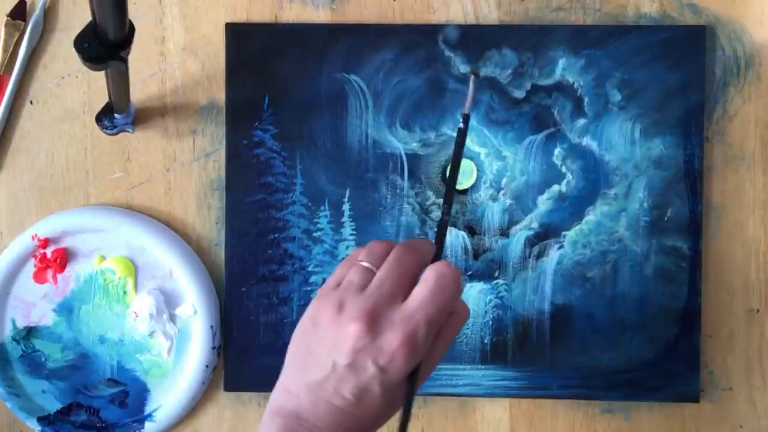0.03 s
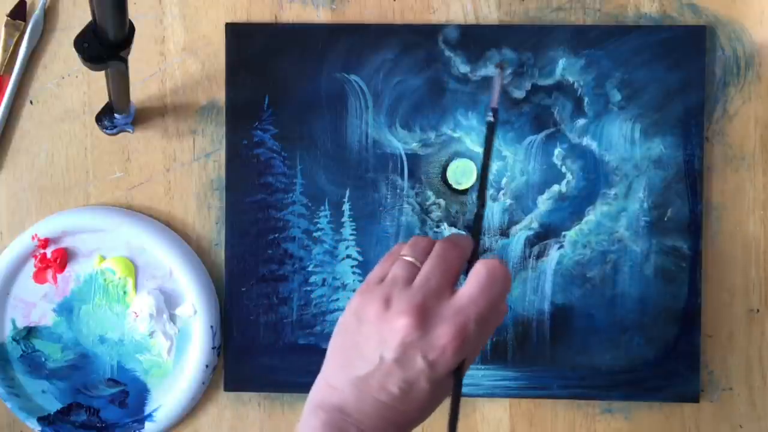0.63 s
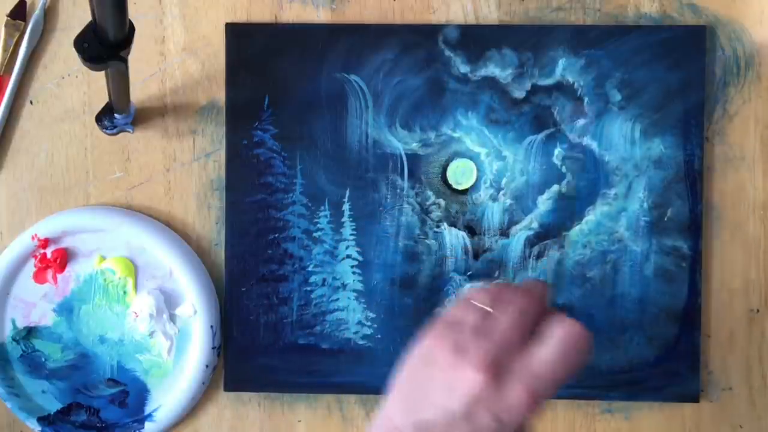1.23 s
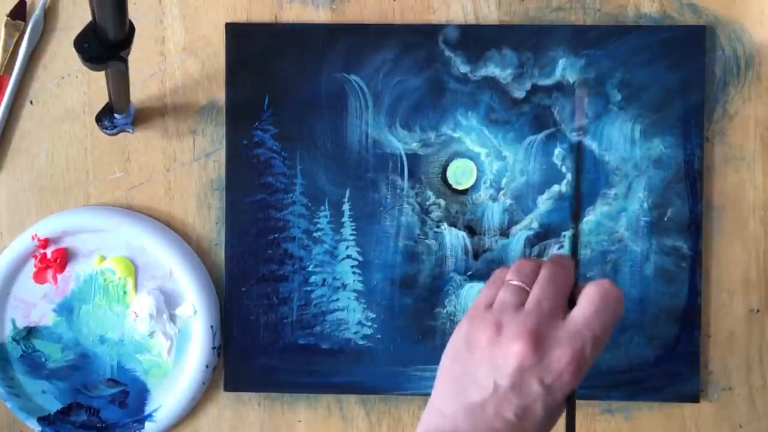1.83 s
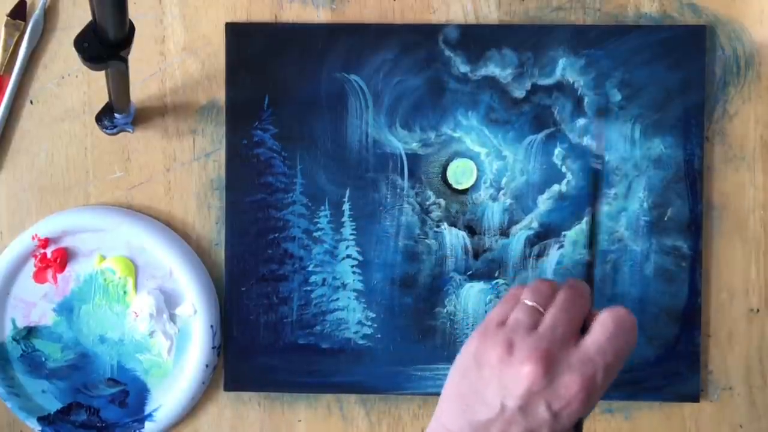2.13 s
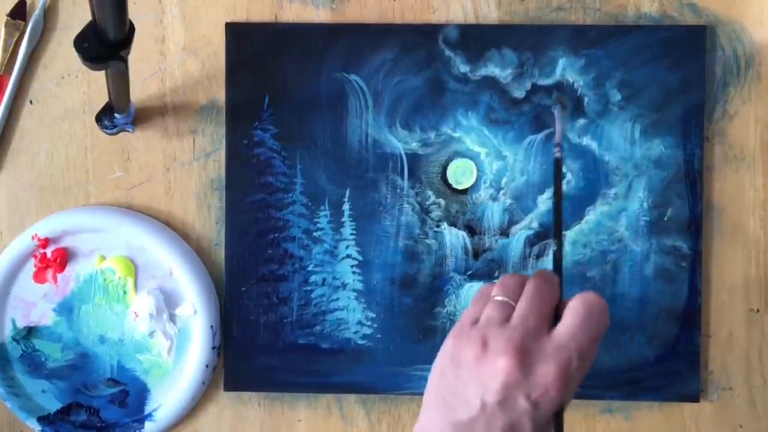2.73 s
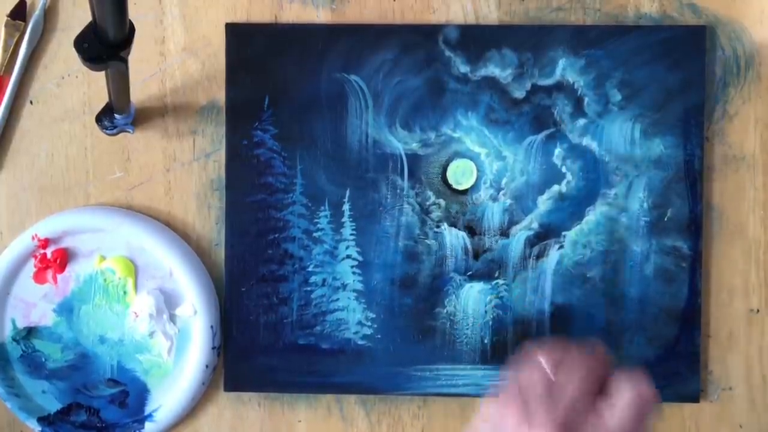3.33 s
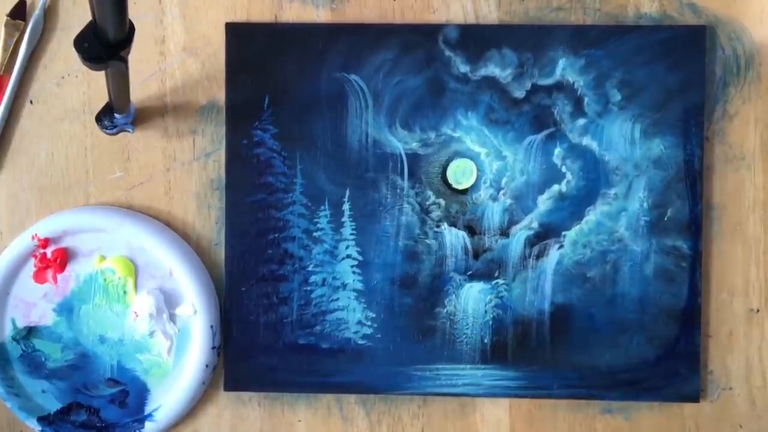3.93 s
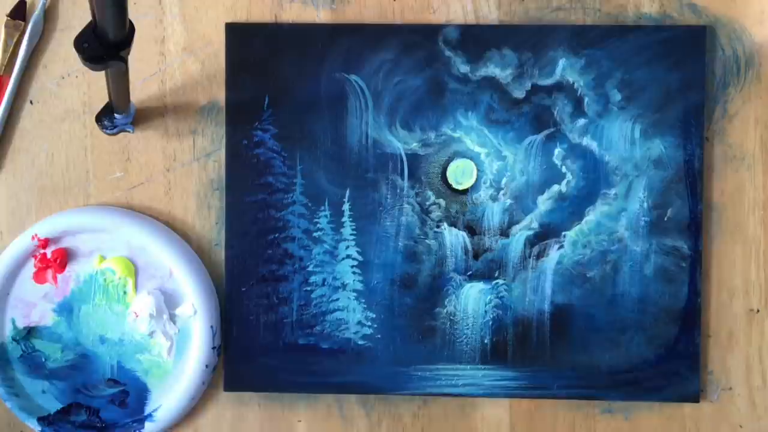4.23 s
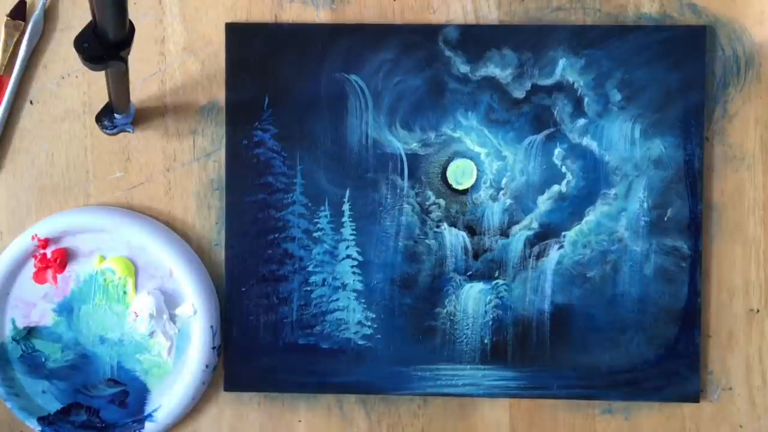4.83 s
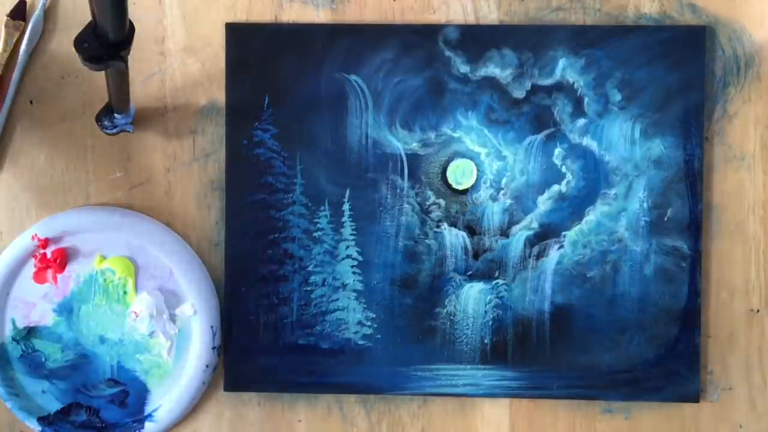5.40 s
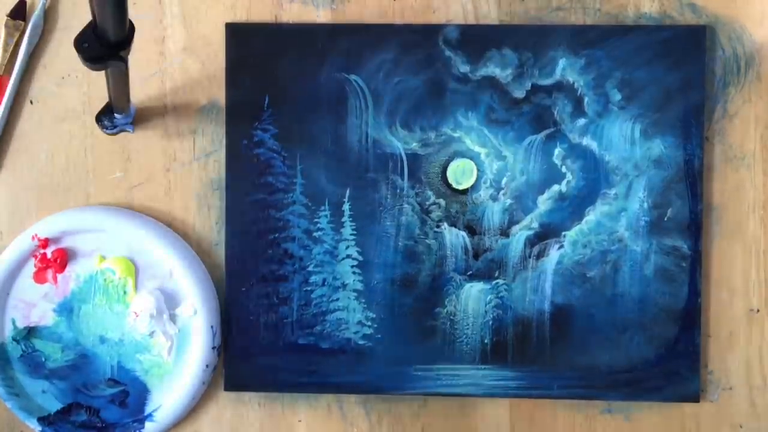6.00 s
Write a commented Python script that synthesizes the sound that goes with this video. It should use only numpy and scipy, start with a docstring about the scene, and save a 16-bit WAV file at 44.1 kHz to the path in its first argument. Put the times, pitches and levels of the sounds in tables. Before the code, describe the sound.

In a quiet room with a steady, soft ventilation hum, bristles touch a nearby canvas in faint, irregular dabs. Then the paintbrush is laid on a wooden table farther from the microphone: one sharp, loud knock of the handle, a short slide, a duller knock and a small bounce, each with a brief room echo. It settles with a couple of very faint taps.

```python
"""Paintbrush on canvas and table

A small brush dabs softly at a nearby canvas in a quiet room; its hairs hiss and its ferrule ticks once.
It is then set aside on a wooden table farther off: the handle knocks sharply once, slides, drops with a
duller knock and bounces. Each impact excites the modes of handle and table, and the room reverberates
briefly. Ventilation murmurs underneath."""
import sys
import numpy as np
from scipy import signal
from scipy.fft import rfft, irfft
from scipy.io import wavfile

SR = 44100
rng = np.random.default_rng(int(sys.argv[2]) if len(sys.argv) > 2 else 0)


def wav_record(signal):
    """Record a signal, one row per channel, as 16-bit PCM in the file named by sys.argv[1]."""
    frames = np.transpose(np.atleast_2d(signal))
    bounded = np.clip(frames, -1, 1)
    # unit amplitude maps onto the largest positive 16-bit level
    quanta = np.round(bounded * 32767).astype(np.int16)
    wavfile.write(sys.argv[1], SR, quanta)


N = 267290
CUTOFF_HZ = 15700   # upper limit of the sound's spectrum


def from_db(db):
    """Amplitude ratio of a level in decibels."""
    return 10 ** (np.asarray(db) / 20)


def unit_rms(x):
    """Normalisation to an rms amplitude of 1."""
    return x / np.sqrt(np.mean(x ** 2) + 1e-20)


def at_hz(points, hz, column=1):
    """Interpolation of a table column on a logarithmic frequency axis."""
    points = np.array(points)
    return np.interp(np.log(np.maximum(hz, 1)), np.log(points[:, 0]), points[:, column])


def coloured_noise(spectrum, size=N):
    """Random phases under a spectral envelope give noise, here of unit rms."""
    hz = np.fft.rfftfreq(size, 1 / SR)
    phases = np.exp(2j * np.pi * rng.random(len(hz)))
    return unit_rms(irfft(from_db(at_hz(spectrum, hz)) * phases, size))


def filtered(x, kind, hz):
    """Second-order low-pass or high-pass: 12 dB per octave beyond the cutoff."""
    return signal.sosfilt(signal.butter(2, hz, kind, fs=SR, output="sos"), x)


def swell(middle_s, sigma_s):
    """Envelope of a smooth touch: pressure rises and falls as a bell curve."""
    return np.exp(-.5 * ((np.arange(N) / SR - middle_s) / sigma_s) ** 2)


def decay(t, t60):
    """Exponential damping: 60 dB are lost in t60 seconds."""
    return np.exp(-np.log(1000) * t / t60)


def add(track, start_s, sound):
    """Superposition of a sound on the track from a given time."""
    start = round(start_s * SR)
    track[start:start + len(sound)] += sound[:N - start]


def ventilation(air_db=-54.5):
    """Steady broadband air noise, with a wavering drone from noise-driven room resonances."""
    # spectrum of the moving air: (frequency [Hz], relative spectral level [dB])
    air_spectrum = [(15, -49), (25, -24), (44, -8.5), (86, -4.5), (116, -1.5), (178, -9), (281, -8),
                    (349, -7), (741, -14.5), (997, -13.5), (1950, -23), (2300, -24), (2630, -26),
                    (6210, -29.5), (15500, -39)]
    # low room resonances: (frequency [Hz], bandwidth [Hz], level [dB])
    resonances = [(114, 9, -63), (150, 12, -73.5), (295, 21, -70), (358, 45, -69.5)]
    out = from_db(air_db) * coloured_noise(air_spectrum)
    for hz, width, db in resonances:
        resonator = signal.iirpeak(hz, hz / width, fs=SR)
        drone = signal.lfilter(*resonator, rng.standard_normal(N + SR))[SR:]   # steady state only
        out += from_db(db) * unit_rms(drone)
    return out


def brush_dabs(grain_db=2.0, crossover_hz=5500, sigma_s=.017, usual_db=-60.5):
    """Friction noise of many hairs on the weave; a firmer dab bends them further and scratches lower."""
    # touches of the bristles on the canvas: (time of peak [s], level [dB])
    dabs = [(.25, -63.5), (.432, -66.5), (.622, -61.5), (.805, -63.5), (1.038, -65), (1.095, -62),
            (1.778, -56.5), (2.019, -57.5), (2.15, -64), (2.208, -62.5), (2.323, -61.5), (2.39, -56.5),
            (2.827, -61.5), (2.888, -60), (3, -62), (3.073, -60.5), (3.24, -65.5), (3.382, -53)]
    # friction spectrum of the bristles: (frequency [Hz], relative spectral level [dB])
    bristle_spectrum = [(700, -2), (1300, -7), (1750, 6), (2150, -12), (2850, 0), (3600, -2), (6800, -3),
                        (8200, -7.5), (15500, -4.5)]
    hairs = coloured_noise(bristle_spectrum)
    flicker = unit_rms(filtered(rng.standard_normal(N), "low", 600))
    hairs *= from_db(grain_db * flicker)
    scratch = filtered(hairs, "low", crossover_hz)
    hiss = filtered(hairs, "high", crossover_hz)
    out = np.zeros(N)
    for middle_s, db in dabs:
        scratch_db = -3.5 + .4 * (db - usual_db)
        friction = from_db(scratch_db) * scratch - hiss   # the minus puts the two bands in phase
        out += from_db(db) * swell(middle_s, sigma_s) * friction
    return out


def tick_and_rubs(soft_hz=2200, firm_extra_hz=6500, firm_db=-50.5, doubling_db=1.1):
    """Contact noise of light touches: the bandwidth widens as the touch grows firmer."""
    # a light tick of the ferrule on the canvas, then soft rubs and slides on the table:
    # (time of peak [s], level [dB], standard deviation of the envelope [s])
    touches = [(3.008, -54.5, .0037), (4.126, -66, .15), (4.733, -57.5, .017), (4.819, -50, 0.0059),
               (4.835, -53, 0.014), (5.431, -55.5, 0.0052), (5.477, -56, .013), (5.54, -63.5, .058)]
    # spectrum of the contact noise: (frequency [Hz], relative spectral level [dB])
    contact_spectrum = [(250, -11.5), (500, 4), (1200, 0.5), (2400, 0), (4300, -3.5), (8000, -7.5),
                        (15000, -18)]
    noise, out = coloured_noise(contact_spectrum), np.zeros(N)
    for middle_s, db, sigma_s in touches:
        edge_hz = soft_hz + firm_extra_hz * 2 ** ((db - firm_db) / doubling_db)
        out += from_db(db) * swell(middle_s, sigma_s) * unit_rms(filtered(noise, "low", edge_hz))
    return out


def modal_ring(modes, t, travel_500_hz_s=.002994):
    """Damped modes of struck wood; bending waves are dispersive, so the slower low ones start later."""
    out = np.zeros(len(t))
    for k, (hz, db, t60) in enumerate(modes):
        lag_s = travel_500_hz_s * (np.sqrt(500 / hz) - np.sqrt(500 / CUTOFF_HZ))
        age = np.maximum(t - lag_s, 0)
        out += (-1) ** k * from_db(db) * decay(age, t60) * np.sin(2 * np.pi * hz * age)
    return out


def handle_knocks(rise_s=.0006, click_db=24.5, radiation_hz=220):
    """Impacts excite the modes of handle and table; returns (direct sound, click sent into the room)."""
    # blows: (time [s], handle level [dB], table level [dB], crack level [dB], contact cutoff [Hz])
    impacts = [(4.3719, -1.5, -21.5, 3, 12700), (4.8427, -22.5, 1, -7, 4200),
               (4.9673, -28, -13, -16.5, 4870), (5.432, -71, -40, -53, 2600), (5.474, -66, -34, -51, 1500)]
    # the handle's short clack, then the wood ringing under it: (frequency [Hz], level [dB], t60 [s])
    handle_modes = [(623, -20.5, 0.033), (950, -20.5, 0.062), (1404, -4, 0.047), (1804, -12, 0.031),
                    (2123, -11.5, .03), (2277, -6.5, 0.032), (2714, -20, .02), (3190, -8.5, 0.025),
                    (3450, -17.5, 0.034), (4230, -7, 0.03), (4598, -18, 0.025), (5730, -29, .012),
                    (9740, -19.5, 0.0055), (502, -24.5, 0.19), (597, -31.5, 0.28), (684, -27, .25),
                    (913.5, -28.5, 0.13), (999, -36, 0.27), (1317, -30, .3), (1470, -23.5, 0.26),
                    (2076, -28, 0.28)]
    # modes of the table top: (frequency [Hz], level [dB], t60 [s])
    table_modes = [(229.7, -43, 0.019), (317.7, -36.5, 0.18), (353, -24.5, 0.059), (544, -15, 0.021),
                   (594.5, -20.5, 0.092), (610.3, -21, .13), (1048, -36.5, 0.1608), (1226, -25.5, 0.085),
                   (1473, -21, 0.074), (1850, -41, 0.038), (2266, -16.5, .024), (2680, -24.5, 0.011),
                   (2996, -20, 0.029), (3160, -25.5, 0.05)]
    # dense, quickly damped modes heard as a crack: (frequency [Hz], relative spectral level [dB])
    crack_spectrum = [(150, -24), (400, -9.5), (1000, -5.5), (2500, 10), (4300, -3.5), (5500, -1),
                      (7500, -14), (10000, -15), (15500, -17.5)]
    # broad click radiated by the table top: (frequency [Hz], relative spectral level [dB])
    click_spectrum = [(150, -19), (400, -10.5), (700, -4), (1100, -5.5), (1600, -2), (2500, -1.5),
                      (3500, -3), (4400, -7.5), (5000, -13.5), (6200, -14), (7500, -20.5), (10000, -27.5),
                      (15500, -35)]
    direct, radiated, t = np.zeros(N), np.zeros(N), np.arange(SR // 2) / SR
    hz = np.fft.rfftfreq(len(t), 1 / SR)
    click = irfft(from_db(click_db + at_hz(click_spectrum, hz)), len(t))
    click = np.roll(click, SR // 500)[:len(t) // 2]   # the pulse peaks after 2 ms
    for start_s, handle_db, table_db, crack_db, contact_hz in impacts:
        crack = from_db(-10) * coloured_noise(crack_spectrum, size=len(t)) * decay(t, t60=.012)
        treble = filtered(rng.standard_normal(len(t)), "high", 6500)
        snap = from_db(-20) * treble * decay(t, t60=.008)   # the first instant of contact
        blow = from_db(crack_db) * (crack + snap) * (1 - np.exp(-t / rise_s))
        blow += from_db(handle_db) * modal_ring(handle_modes, t)
        blow += from_db(table_db) * modal_ring(table_modes, t)
        softness = np.exp(-2 * np.pi * contact_hz / SR)   # a longer contact rounds off the treble
        contact = [1 - softness], [1, -softness]
        add(direct, start_s, signal.lfilter(*contact, blow))
        add(radiated, start_s, signal.lfilter(*contact, from_db(crack_db) * click))
    return filtered(direct, "high", radiation_hz), radiated   # the wood is too small to radiate bass


def early_reflections(x):
    """Specular reflection: the nearest surfaces return two delayed, weaker copies of the sound."""
    # reflection paths: (delay [s], level [dB])
    paths = [(.0075, -21.5), (0.011, -19)]
    samples = np.arange(N)
    return sum(from_db(db) * np.interp(samples - delay * SR, samples, x) for delay, db in paths)


def reverberation(x, onset_s=.0036):
    """The room's diffuse field builds up within milliseconds and decays at its own rate in each band."""
    # reverberant field: (frequency [Hz], level [dB], t60 [s])
    room_bands = [(150, -8.5, .35), (353, -9.5, .7), (580, -5, 0.42), (985, -8, 0.38), (1500, -11, .43),
                  (2310, -11.5, 0.38), (3275, -8.5, 0.36), (4280, -11.5, 0.46), (6000, -14, 0.31),
                  (9000, -13.5, .28), (15170, -14.5, .24)]
    t = np.arange(SR * 3 // 4) / SR
    hz, white = np.fft.rfftfreq(len(t), 1 / SR), rfft(rng.standard_normal(len(t)))
    edges, response = np.geomspace(100, CUTOFF_HZ, 23), np.zeros(len(t))
    for low, high in zip(edges, edges[1:]):
        centre = np.sqrt(low * high)
        band = irfft(white * ((hz >= low) & (hz < high)), len(t))
        band *= decay(t, at_hz(room_bands, centre, column=2))
        band *= 1 - np.exp(-(t / onset_s) ** 2)
        band *= np.sqrt(2 * (high - low) / SR / np.sum(band ** 2))   # unit gain within the band
        response += from_db(at_hz(room_bands, centre)) * band
    return signal.fftconvolve(x, response)[:N]


def scene():
    """Superposition: the close dabs arrive as direct sound only; tick, rubs and knocks also echo."""
    knocks, click = handle_knocks()
    contacts = knocks + tick_and_rubs()
    direct = brush_dabs() + contacts
    echoes = early_reflections(contacts) + reverberation(contacts + click)
    return (direct + echoes + ventilation())[None, :]


def record(dry, ceiling=1.1):
    """The microphone port notches the treble, saturation rounds the peaks and a low-pass cuts the top."""
    # narrow notches of the port: (frequency [Hz], bandwidth [Hz], gain at the centre [dB])
    port_notches = [(4910, 340, -4.5), (10380, 770, -5.5)]
    for hz, width, depth_db in port_notches:
        band = signal.lfilter(*signal.iirpeak(hz, hz / width, fs=SR), dry)
        dry = dry + (from_db(depth_db) - 1) * band
    rounded = dry / (1 + (dry / ceiling) ** 6) ** (1 / 6)
    return signal.sosfilt(signal.ellip(10, .1, 70, CUTOFF_HZ, fs=SR, output="sos"), rounded)


dry = scene()
out = record(dry)
wav_record(out)
```